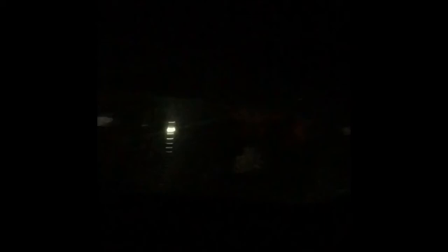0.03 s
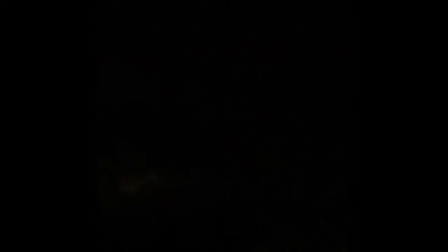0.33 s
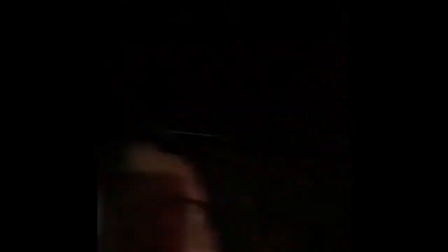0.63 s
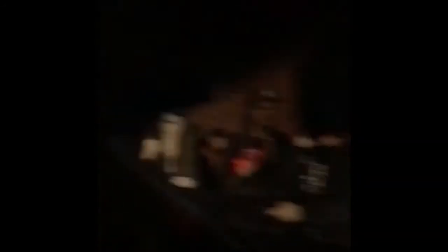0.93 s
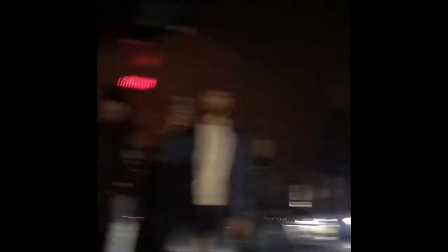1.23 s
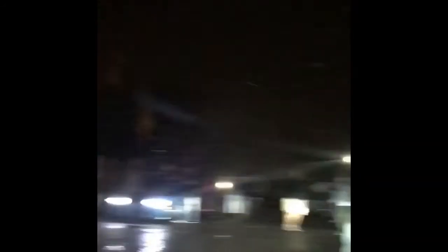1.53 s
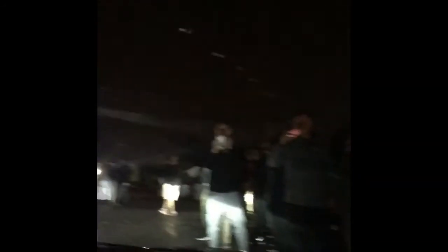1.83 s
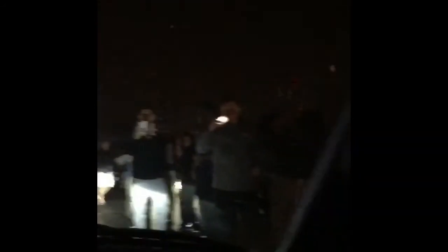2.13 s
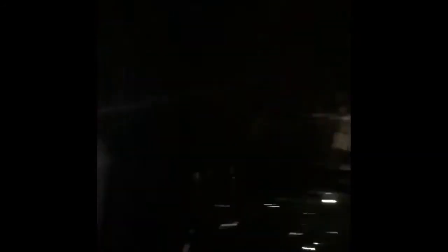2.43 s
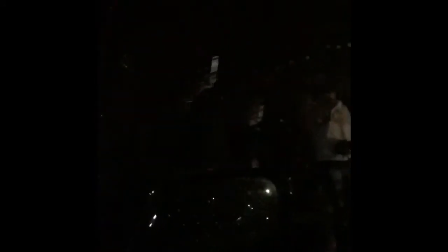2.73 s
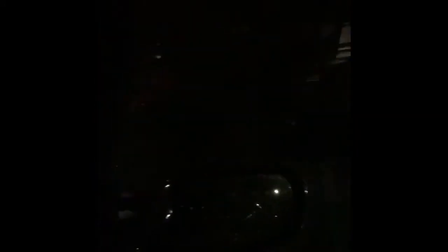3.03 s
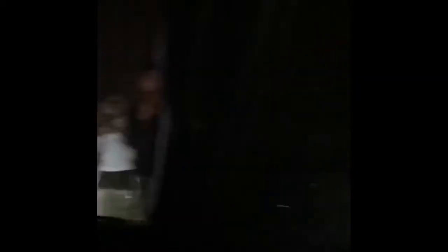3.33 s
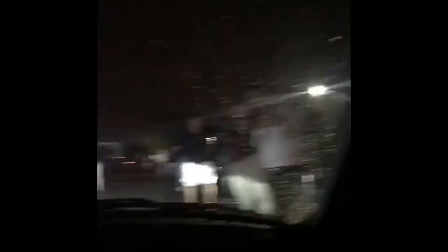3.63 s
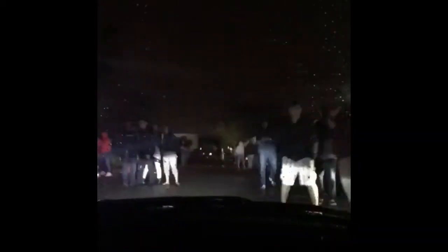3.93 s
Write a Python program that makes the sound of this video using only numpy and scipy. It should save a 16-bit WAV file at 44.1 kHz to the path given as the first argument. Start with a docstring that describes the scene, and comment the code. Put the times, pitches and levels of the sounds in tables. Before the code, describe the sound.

Loud, burbling car engine heard from inside, revs dropping, rising, then sinking to a drone.

```python
"""Inside a six-cylinder car sliding about on wet tarmac, while the revs fall, climb and fall again.
The lowest firing harmonics boom in the cabin; the upper ones glide through pipe and body resonances.
Uneven cylinders add a burble, exhaust gas rasps after each firing and a whine sounds under load.
Tyres throw spray, the body rumbles and thumps, a panel drones at high revs and loose things tick."""
import sys
import numpy as np
from scipy import signal
from scipy.fft import rfft, irfft
from scipy.io import wavfile
from scipy.ndimage import map_coordinates

SR = 44100
rng = np.random.default_rng(int(sys.argv[2]) if len(sys.argv) > 2 else 0)


def transcribe(signal):
    """Save signal, clipped to [-1, 1], as a 16-bit WAV file at the path in sys.argv[1]."""
    frames = np.atleast_2d(signal).T
    limited = np.clip(frames, -1, 1)
    pcm = np.round(limited * 32767).astype(np.int16)
    wavfile.write(sys.argv[1], SR, pcm)


N = 176400
TIME_S = np.arange(N) / SR
BINS_HZ = np.arange(N + 1) * SR / (2 * N)


def undb(db):
    """Decibels to gain."""
    return 10 ** (np.asarray(db) / 20)


def unit(x):
    """Scale to rms 1."""
    return x / np.sqrt(np.mean(x ** 2))


def curve(table, column=1):
    """One table column, linearly interpolated over time."""
    rows = np.array(table, float)
    return np.interp(TIME_S, rows[:, 0], rows[:, column])


def gain_at(hz, points):
    """Gain of a (freq_hz, gain_db) colour, interpolated over log frequency."""
    rows = np.array(points, float)
    return undb(np.interp(np.log(np.maximum(hz, 1)), np.log(rows[:, 0]), rows[:, 1]))


def shape(x, gains):
    """Minimum-phase filter with the given gains at BINS_HZ."""
    cepstrum = irfft(np.log(gains))
    cepstrum[1:N] *= 2
    cepstrum[N + 1:] = 0
    return irfft(rfft(x, 2 * N) * np.exp(rfft(cepstrum)))[:N]


def colour(x, points):
    """Filter by (freq_hz, gain_db) points."""
    return shape(x, gain_at(BINS_HZ, points))


def noise(points):
    """Coloured noise, rms 1."""
    return unit(colour(rng.standard_normal(N), points))


def wander(rate_hz):
    """Smooth random drift, spread near 1."""
    knots = np.linspace(0, N, 2000)
    smooth = map_coordinates(rng.standard_normal(2048), [knots / SR * rate_hz], order=3, mode="mirror")
    return np.interp(np.arange(N), knots, smooth)


def cabin(x, t60_s=0.11, wet_db=-4.5):
    """Add dense, short reflections from glass and seats."""
    age_s = np.arange(SR // 4) / SR
    tail = rng.standard_normal(len(age_s)) * np.exp(-np.log(1000) * age_s / t60_s)
    return x + undb(wet_db) * signal.fftconvolve(x, tail / np.linalg.norm(tail))[:N]


# Spray envelope: time_s, level_db
SPRAY_LEVEL = [(0.0, -65), (0.01, -76), (0.19, -65), (0.4, -56.5), (0.78, -66.5), (0.97, -62), (1.22, -70),
               (1.41, -63.5), (1.98, -60.5), (2.19, -68), (2.68, -75), (3.9, -70)]
# Spray spectrum: freq_hz, gain_db
SPRAY_COLOUR = [(1000, -19), (4000, 2.5), (6000, 5), (7500, 1.5), (9500, 2.5), (10500, -9), (11500, -3.5),
                (15000, 3)]


def spray(trim_db=0.5):
    """Tyres throw fine droplets: dense impulses of random size."""
    drops = rng.standard_normal(N) * (rng.random(N) < .08)
    drops *= undb(2.2 * rng.exponential(size=N))
    hiss = unit(cabin(colour(drops, SPRAY_COLOUR)))
    return hiss * undb(curve(SPRAY_LEVEL) + trim_db + .8 * wander(25))


# Splash spectrum: freq_hz, gain_db
SPLASH_COLOUR = [(600, -31.5), (1700, -4.5), (2400, 3.5), (4000, -2.5), (6000, -12), (8000, -21),
                 (15000, -29.5)]


def splash(centre_s=0.53, width_s=0.15, level_db=-46.5):
    """One swish through standing water."""
    swell = np.exp(-.5 * ((TIME_S - centre_s) / width_s) ** 2)
    return noise(SPLASH_COLOUR) * undb(level_db + wander(34)) * swell


# Knocks of loose things: start_s, level_db
TICKS = [(2.559, -50), (3.492, -46), (3.9225, -33)]
# Tick spectrum: freq_hz, gain_db
TICK_COLOUR = [(300, -26.5), (1200, -4.5), (1500, -3), (1950, 9.5), (2500, -6.5), (2900, -4.5), (3400, -1),
               (3800, -15.5), (4450, 0), (5500, -5.5), (9000, -18), (11000, -19.5), (15000, -29)]


def ticks(snap_s=0.0019, ring_s=.011, ring_db=-2):
    """Loose things knock in the cabin: a sharp snap and a brief rattling ring."""
    envelope = np.zeros(N)
    for start_s, level_db in TICKS:
        age_s = np.maximum(TIME_S - start_s, 0)
        decay = np.exp(-age_s / snap_s) + undb(ring_db) * np.exp(-age_s / ring_s)
        envelope += (TIME_S >= start_s) * undb(level_db) * decay
    return envelope * noise(TICK_COLOUR)


# Body vibration: time_s, shudder_db, rumble_db
BODY_LEVELS = [(0.0, -50, -35), (0.73, -50, -31.5), (0.89, -38, -18), (1.02, -31, -35.5), (1.19, -47, -24),
               (2.27, -42, -26), (2.46, -37.5, -39.5), (2.71, -39.5, -32), (3.25, -37, -31.5),
               (3.4, -38.5, -23.5), (3.45, -33.5, -23.5), (3.65, -35.5, -20), (3.69, -39.5, -19),
               (3.87, -42, -20.5), (3.91, -32, -13), (3.96, -22.5, -19.5)]
# Deep shudder spectrum: freq_hz, gain_db
SHUDDER_COLOUR = [(8, -22.5), (22, -5.5), (36, 2.5), (48, 3), (70, -22), (200, -57.5)]
# Low rumble spectrum: freq_hz, gain_db
RUMBLE_COLOUR = [(20, -27), (42, -8.5), (54, -3.5), (70, -1), (95, -16), (180, -20.5), (300, -32.5),
                 (1000, -72)]


def body_rumble(trim_db=-0.5):
    """The body shudders and rumbles over the ground."""
    shudder = noise(SHUDDER_COLOUR) * undb(curve(BODY_LEVELS))
    rumble = noise(RUMBLE_COLOUR) * undb(curve(BODY_LEVELS, column=2))
    return (shudder + rumble) * undb(trim_db)


# Wheel thumps: centre_s, level_db
BUMPS = [(0.898, -15), (3.935, -18)]


def bumps(pitch_hz=63.3, width_s=0.02):
    """Wheels drop into dips and thump the body."""
    out = np.zeros(N)
    for centre_s, level_db in BUMPS:
        offset_s = TIME_S - centre_s
        envelope = undb(level_db) * np.exp(-(offset_s / width_s) ** 2)
        out += envelope * np.sin(2 * np.pi * pitch_hz * offset_s)
    return out


def panel(firing_hz, pitch_hz=271, level_db=-20, onset_hz=202.3):
    """A narrow, unsteady panel resonance drones while the firing rate is above the onset."""
    drone = noise([(pitch_hz / 1.3, -40), (pitch_hz / 0.98, -5), (pitch_hz, 0),
                   (pitch_hz * 0.95, -8), (pitch_hz * 1.49, -35), (3000, -80)])
    drive = (1 + np.tanh((firing_hz - onset_hz) / 9)) / 2
    return drone * undb(level_db) * drive


# Whine under load: time_s, pitch_hz, level_db
WHINE = [(0, 6140, -67), (.2, 5450, -68), (.47, 4240, -65), (.62, 3702, -58), (.72, 3317, -66),
         (.87, 3020, -59), (1.04, 2750, -50.5), (1.22, 2650, -62), (1.36, 2599, -49), (1.6, 2500, -55),
         (1.8, 2445, -47.5), (1.98, 2411, -50), (2.1, 2368, -68.5), (2.25, 2350, -110)]


def whine(clear_below_hz=2600, trim_db=-0.5):
    """A thin whistle winds down, breathy while high and clearer once it settles."""
    centre_hz = curve(WHINE)
    waver = .01 + .14 * np.clip(centre_hz / clear_below_hz - 1, 0, .2)
    pitch_hz = centre_hz * (1 + waver * wander(300))
    level_db = curve(WHINE, column=2) + 2.2 * wander(46) + trim_db
    return np.sqrt(2) * undb(level_db) * np.sin(2 * np.pi * np.cumsum(pitch_hz) / SR)


# Pipe and body modes: centre_hz, width_hz, lift_db
RESONANCES = [(411.5, 32, 9.5), (474, 37, 7), (528, 21, 4.5), (595.6, 34, 9.5), (722, 23, 10.5),
              (829, 42, 8), (960, 36, 12), (1088, 60, 4.5), (1290, 70, 3), (1580, 140, 1.5)]


def resonance_gain(hz):
    """Lift from the pipe and body resonances at each frequency."""
    return 1 + sum((undb(lift_db) - 1) / (1 + ((hz - centre_hz) / (width_hz / 2)) ** 2)
                   for centre_hz, width_hz, lift_db in RESONANCES)


def ring(x):
    """Pass a sound through the pipe and body resonances."""
    return shape(x, resonance_gain(BINS_HZ))


# Exhaust envelope: time_s, midrange_db, treble_db
EXHAUST_LEVELS = [(0.0, -33, -50), (0.15, -38, -52), (0.47, -33, -52), (0.69, -43, -47.5), (1.27, -32, -48),
                  (1.37, -34, -48), (1.63, -33.5, -47), (1.7, -35, -47), (2.01, -34, -45.5),
                  (2.17, -37, -51.5), (2.7, -47, -57), (3.7, -37.5, -51), (3.89, -37, -50.5),
                  (3.9, -38.5, -49)]
# Gas rush spectrum: freq_hz, gain_db
RUSH_COLOUR = [(100, -25.5), (300, 4), (400, -4.5), (520, -7), (750, -6), (1000, -8.5), (1400, -10),
               (2000, -24.5), (4000, -39)]
# Rasp spectrum: freq_hz, gain_db
RASP_COLOUR = [(500, -25.5), (1200, -1.5), (1700, 3), (2100, -1.5), (2600, 0), (3300, -4.5), (4200, -10),
               (4900, -14.5), (6300, -16), (7500, -26), (15000, -40.5)]


def exhaust_gas(firings, decay_firings=.3, steady_flow=2.4, rush_trim_db=-3):
    """Gas rushes and rasps, with a puff after each firing."""
    puff = steady_flow + np.exp(-(firings % 1) / decay_firings)
    rush = unit(ring(colour(puff * rng.standard_normal(N), RUSH_COLOUR)))
    rush *= undb(curve(EXHAUST_LEVELS) + rush_trim_db)
    rasp = unit(cabin(colour(puff * rng.standard_normal(N), RASP_COLOUR)))
    rasp *= undb(curve(EXHAUST_LEVELS, column=2))
    return (rush + rasp) * undb(.6 * wander(20))


# Departure from mean firing strength, per cylinder: share
CYLINDER_IMBALANCE = [0.92, 0.38, -0.69, 0.52, -.15, 0.0084]
# Balance relative to the exhaust midrange: time_s, burble_db, overtones_db
EXHAUST_MIX = [(0, -4.5, 2), (.4, 10.5, -10), (.8, 13, -10), (1.0, 15.5, -6), (1.3, 11, -3.5),
               (1.6, 7.5, -3.5), (2.0, 10, 0.5), (2.4, 13.5, -5.5), (2.85, 16.5, -0.5), (3.2, 16, -4.5),
               (3.6, 11.5, -5.5), (4, 16, -11.5)]
# Burble spectrum: freq_hz, gain_db
BURBLE_COLOUR = [(20, -22), (45, -14.5), (70, -6), (105, -3), (150, 14.5), (185, 1), (240, -5), (320, 1),
                 (365, -11), (470, -23.5), (600, -25.5), (800, -25), (1000, -31), (1400, -40.5),
                 (3000, -52.5), (8000, -78)]


def burble(firings, scatter=0.35):
    """Strong and weak firings ring the exhaust and fill in lines between the harmonics."""
    index = np.arange(1, int(firings[-1]))
    strength = np.array(CYLINDER_IMBALANCE)[index % len(CYLINDER_IMBALANCE)]
    strength += scatter * rng.standard_normal(2048)[index]
    pulses = np.bincount(np.searchsorted(firings, index), strength, N)
    level_db = curve(EXHAUST_LEVELS) + curve(EXHAUST_MIX)
    return unit(ring(colour(pulses, BURBLE_COLOUR))) * undb(level_db)


# Upper harmonic spectrum: freq_hz, gain_db
OVERTONE_COLOUR = [(300, 1), (400, 1.5), (470, -9), (560, -1), (680, -13), (800, -12.5), (960, -16.5),
                   (1200, -21.5), (2000, -26.5), (4000, -39.5)]


def overtones(firing_hz, firings, growl_db=-9.5, wander_db=3, wander_rad=.3):
    """Upper firing harmonics and weaker engine-cycle lines between them glide through the resonances."""
    out = np.zeros(N)
    cylinders = len(CYLINDER_IMBALANCE)
    for line in range(20, 121):  # multiples of the engine-cycle rate
        between = line % cylinders != 0
        if between and line > 42:
            continue
        harmonic = line / cylinders
        line_hz = harmonic * firing_hz
        phase = 2 * np.pi * (harmonic * firings + rng.random()) + wander_rad * wander(25)
        gain = gain_at(line_hz, OVERTONE_COLOUR) * resonance_gain(line_hz)
        out += gain * undb(between * growl_db + wander_db * wander(7)) * np.sin(phase)
    return out * undb(curve(EXHAUST_LEVELS) + curve(EXHAUST_MIX, column=2))


# Firing harmonics 1, 2 and 3 in the cabin: time_s, level_db
BOOM_1 = [(0, -32), (0.07, -21), (0.22, -18), (0.38, -33.5), (0.46, -13), (0.63, -9.5), (0.72, -14.5),
          (0.78, -13.5), (0.83, -37), (0.92, -27), (1.0, -16.5), (1.12, -5), (1.26, -6.5), (1.5, -8.5),
          (1.68, -11.5), (1.82, -17.5), (1.92, -15.5), (2.0, -8.5), (2.09, -6), (2.3, -9), (2.5, -15.5),
          (2.61, -19), (2.77, -12), (3.08, -12), (3.2, -19), (3.35, -14.5), (3.65, -13.5), (4, -13)]
BOOM_2 = [(0, -45.5), (0.13, -60.5), (0.22, -30.5), (0.35, -35.5), (0.551, -40), (0.85, -36.5), (1.1, -33),
          (1.35, -24.5), (1.6, -24.5), (1.85, -24), (2.12, -26), (2.28, -33), (2.45, -52), (2.58, -34.5),
          (2.66, -21), (2.75, -18), (2.9, -23.5), (3.05, -19), (3.25, -29.5), (3.6, -18), (3.85, -17),
          (4, -20)]
BOOM_3 = [(0, -44), (0.85, -52.5), (0.999, -26), (1.13, -41), (1.3, -37.5), (1.6, -37.5), (1.851, -47.5),
          (2.101, -48.5), (2.33, -31), (2.48, -45.5), (2.65, -31), (2.88, -34.5), (3.1, -35), (3.3, -24),
          (3.6, -30), (4, -35)]
# Brief dips in the boom: centre_s, width_s, depth_db
BOOM_DIPS = [(.03, 0.017, -15), (2.606, 0.011, -6)]


def boom(firings, flutter_db_per_harmonic=1.04):
    """The three lowest firing harmonics, with tabled swells where they cross cabin resonances."""
    out = np.zeros(N)
    dip_db = sum(depth_db * np.exp(-((TIME_S - centre_s) / width_s) ** 2)
                 for centre_s, width_s, depth_db in BOOM_DIPS)
    for harmonic, levels in enumerate([BOOM_1, BOOM_2, BOOM_3], 1):
        level_db = curve(levels) + dip_db + harmonic * flutter_db_per_harmonic * wander(30)
        out += np.sqrt(2) * undb(level_db) * np.sin(2 * np.pi * harmonic * firings)
    return out


# Engine speed: time_s, firing_hz
FIRING_RATE = [(0, 234), (0.1, 216.7), (0.25, 199.5), (0.38, 174.5), (0.55, 154.1), (0.75, 130.6),
               (0.9, 121.7), (1.02, 125.7), (1.37, 163), (1.52, 174), (1.72, 181.3), (1.9, 182.2),
               (2.03, 176.3), (2.48, 124.9), (2.68, 97.8), (2.8, 91.45), (2.92, 91.1), (3.05, 96.1),
               (3.21, 103.6), (3.45, 104.8), (3.75, 101.0), (4, 95.82)]


def engine(jitter=0.0022):
    """One slightly unsteady firing rate drives boom and exhaust; the whine has its own pitch."""
    firing_hz = curve(FIRING_RATE) * (1 + jitter * wander(30))
    firings = np.cumsum(firing_hz) / SR
    tones = boom(firings) + overtones(firing_hz, firings)
    return tones + burble(firings) + exhaust_gas(firings) + whine(), firing_hz


def scene():
    """Engine, body and wet road inside the cabin, mono."""
    motor, firing_hz = engine()
    body = body_rumble() + bumps() + panel(firing_hz)
    water = spray() + splash()
    return (motor + body + water + ticks())[None]


def record(dry, ceiling=1.2, cutoff_hz=15250):
    """Clip the peaks, then cut the top treble."""
    lowpass = signal.ellip(10, .1, 80, cutoff_hz, fs=SR, output="sos")
    return signal.sosfilt(lowpass, np.clip(dry, -ceiling, ceiling))


dry = scene()
out = record(dry)
transcribe(out)
```